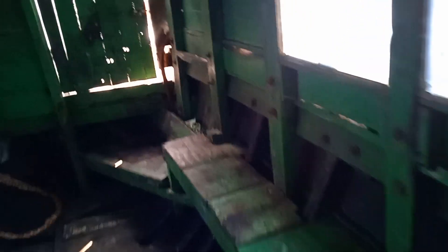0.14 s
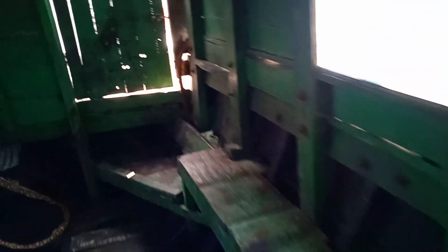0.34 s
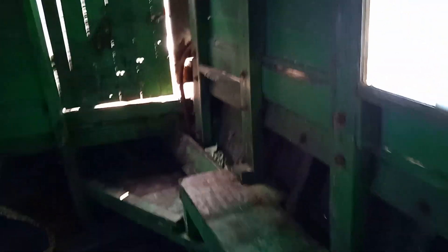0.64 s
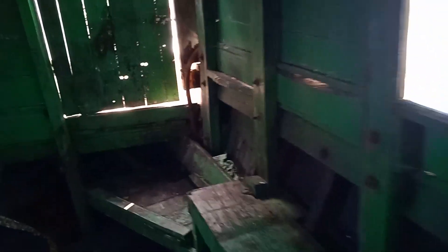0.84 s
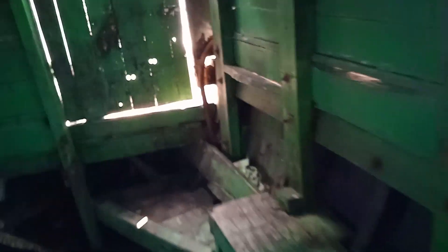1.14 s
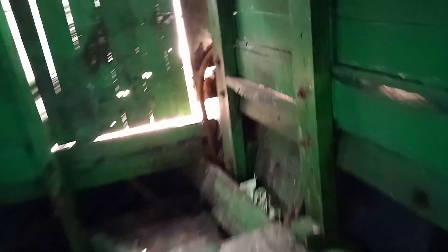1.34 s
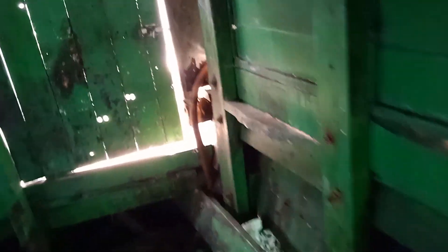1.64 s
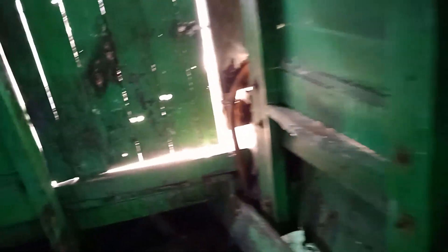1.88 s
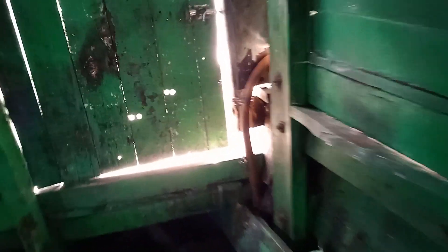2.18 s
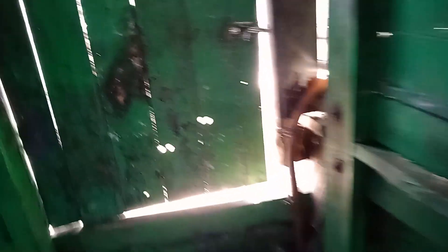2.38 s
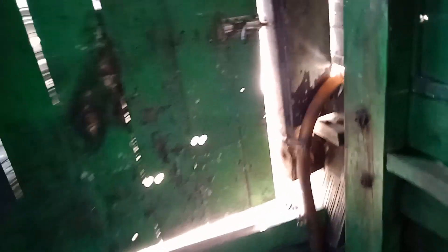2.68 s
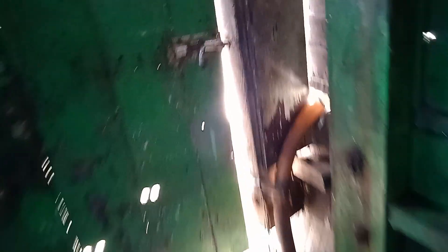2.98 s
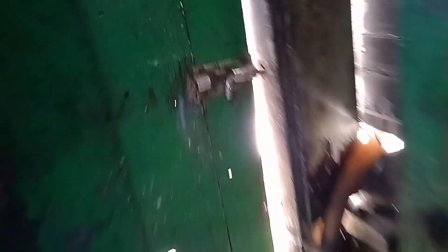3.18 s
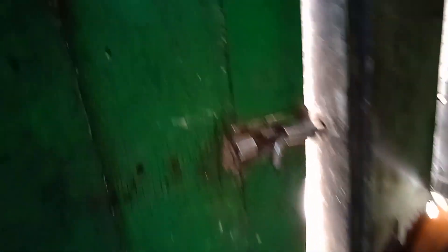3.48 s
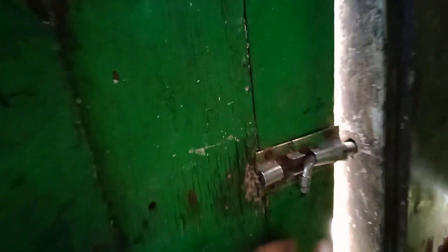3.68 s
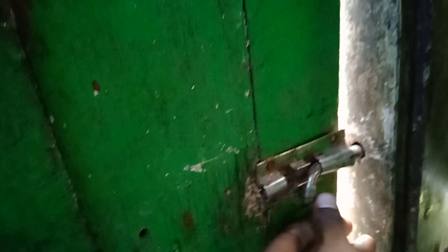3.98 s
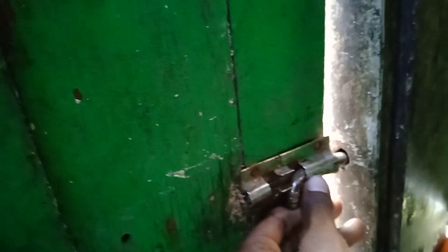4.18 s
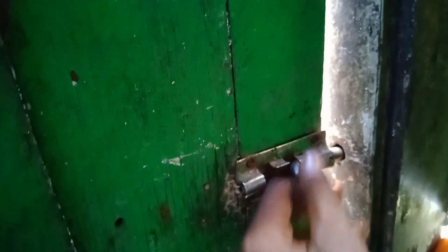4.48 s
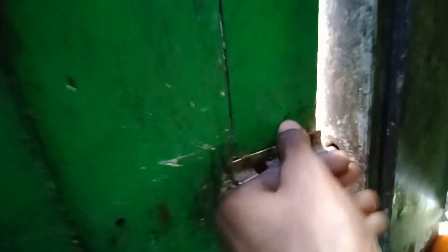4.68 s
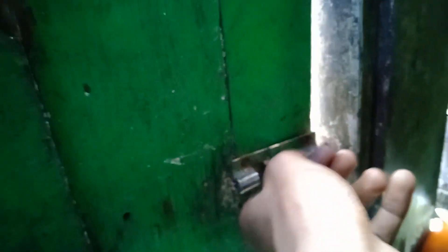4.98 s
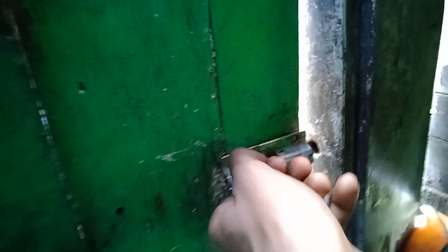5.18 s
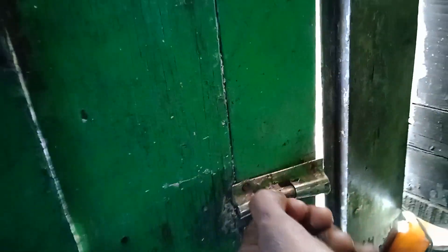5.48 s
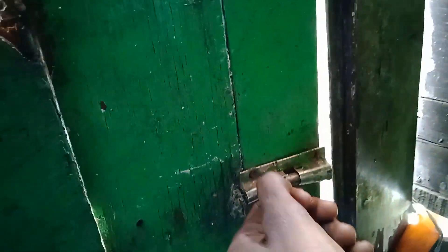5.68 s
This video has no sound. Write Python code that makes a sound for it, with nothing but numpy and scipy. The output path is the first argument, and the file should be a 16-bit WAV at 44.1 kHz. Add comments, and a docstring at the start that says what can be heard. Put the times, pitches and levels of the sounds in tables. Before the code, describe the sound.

Irregular footsteps knock and thud on loose planks over a hollow floor, joined by light scuffing. The steps fade and a nearby metal sliding bolt starts to click, scrape and jingle, with one tiny squeak. It snaps back sharply, and the wooden door gives several light knocks and rattles. The small wooden room adds a short tail to the metal, while a soft low rumble swells under faint steady hiss.

```python
"""From the start, someone walks over loose floor boards in a small wooden cabin: each footfall rattles
the boards and booms in the hollow floor. From 2 s the soles also scuff. From 4.1 s a steel door bolt is
worked by hand: it clicks and scrapes, and its loose handle chirps and rings. From 4.55 s the plank door
knocks as it is pulled; near 5.2 s the bolt shoots back. The plank walls give the steel a short tail.
Throughout, a low rumble swells after the footfalls and door knocks, under faint steady hiss."""
import sys
import numpy as np
from scipy import signal
from scipy.fft import rfft, irfft, next_fast_len
from scipy.io import wavfile
from scipy.ndimage import uniform_filter1d, map_coordinates

SR = 44100
rng = np.random.default_rng(int(sys.argv[2]) if len(sys.argv) > 2 else 0)


def transcribe(signal):
    """Save signal, clipped to [-1, 1], as a 16-bit WAV file at the path in sys.argv[1]."""
    frames = np.atleast_2d(signal).T
    limited = np.clip(frames, -1, 1)
    pcm = np.round(limited * 32767).astype(np.int16)
    wavfile.write(sys.argv[1], SR, pcm)


N = 257544

# Footfalls: (time [s], rattle [dB], boom [dB], boom pitch [Hz], boom t60 [s], ring [dB],
# ring pitch [Hz], bass [dB], treble [dB], wood t60 before cap [s])
FOOTFALLS = [(0.0169, -40, -40, 179, .3, -41, 522, -5.5, -8.5, .18),
             (0.3252, -33.5, -36.5, 169.4, .36, -37, 689, -4.5, -10.5, .19),
             (0.5404, -64, -54.5, 166, .12, -64, 286, 5.5, -5, .25),
             (0.8173, -35, -35.5, 183, .16, -31, 729, 3.5, -26, .26),
             (0.8336, -32, -34.5, 174, .13, -23, 542, -.5, -30, .21),
             (0.9806, -40.5, -18, 140.2, .36, -35.5, 692, -1.5, -14, .23),
             (1.3558, -26, -27, 196.5, .3, -46, 318, -6, -9, .195),
             (2.1218, -45.5, -42.5, 203, .43, -46.5, 649, 8, 7, .2),
             (2.1977, -48.5, -41.5, 162, .34, -57, 690, 5.5, -4, .21),
             (2.3409, -54, -43, 130.5, .33, -47, 632, 6, -6, .22),
             (2.3557, -45.5, -42, 191, .22, -47.5, 608, 4.5, -12, .19),
             (2.5335, -52, -48, 149, .45, -50, 285.5, 8, -21, .28),
             (2.612, -47, -39, 157, .37, -47.5, 296, 1.5, -2.5, .28),
             (2.6679, -35.5, -33, 154.5, .38, -37, 363, -2.5, -18, .22),
             (2.7, -32, -31.5, 148, .48, -26.5, 300.4, 4.5, -21.5, .25),
             (3.0978, -34.5, -31, 196, .31, -38, 312.8, 5.5, -19, .2),
             (3.3078, -44, -45, 143, .22, -66, 654, -10, 8, .18),
             (3.4104, -50, -29, 167.6, .13, -40, 382.5, 10.5, -15, .25),
             (3.4272, -44, -29, 160.7, .29, -51, 389, 0, -14, .22),
             (3.8824, -62, -53.5, 149, .24, -57.5, 364, -4, -8, .18)]


def footsteps():
    """Feet strike loose boards over a hollow floor."""
    return knocks(FOOTFALLS, modes_gain=1.31, rise_s=.003)


# Plank rattle spectrum: (frequency [Hz], density [dB])
PLANK_SPECTRUM = [(120, -4.5), (200, -7), (774, -11.5), (903, -15), (1000, -13), (1790, -12), (2480, -16),
                  (3740, -22), (5840, -25), (8000, -35), (10000, -56), (13000, -85), (22000, -120)]
# Plank decay: (frequency [Hz], multiple of wood t60 [1])
PLANK_DECAY = [(200, 1.27), (1000, 1.27), (3000, 1.15), (8000, .8)]


def knocks(blows, modes_gain, rise_s, mode_count=26, t60_cap_s=.29):
    """Each blow meets other planks: a crack, random modes in dying noise, one plank's ring, a boom."""
    out, t = np.zeros(N), np.arange(SR // 3) / SR
    for at_s, db, boom_db, boom_hz, boom_t60_s, ring_db, ring_hz, bass_db, treble_db, t60_s in blows:
        t60_s = min(t60_s, t60_cap_s)
        tilt = [(450, bass_db), (900, 0), (2500, 0), (5000, treble_db)]
        colour_db = lambda hz: along(PLANK_SPECTRUM, hz) + along(tilt, hz)
        decay_s = lambda hz: t60_s * along(PLANK_DECAY, hz)
        mode_hz = 250 * 10.5 ** rng.random((mode_count, 1)) ** .7
        phase = rng.uniform(0, 2 * np.pi, (mode_count, 1))
        gains = amp(colour_db(mode_hz) + rng.normal(0, 1.86, (mode_count, 1)))
        modes = (gains * mode(t, mode_hz, decay_s(mode_hz), phase)).sum(axis=0) / np.linalg.norm(gains)
        crack = burst(lambda hz: colour_db(hz) + 3 * np.log2(hz / 1000 + 1), lambda hz: .04, len(t))
        rattle = amp(db) * (burst(colour_db, decay_s, len(t)) + modes_gain * modes + 1.7 * crack)
        # A loose plank does not hold its phase.
        drift_rad = uniform_filter1d(np.cumsum(rng.normal(0, .079, len(t))), size=90)
        ring = amp(ring_db) * mode(t, ring_hz, t60_s, drift_rad)
        attack = (1 - np.exp(-t / rise_s)) ** 2
        hollow = boom(boom_db, boom_hz, boom_t60_s, rise_s + .0015)  # builds more slowly
        add(out, at_s - rise_s, (rattle + ring) * attack + hollow)
    return out


def boom(db, hz, t60_s, rise_s):
    """The hollow behind the boards: a short upper mode beats against a longer lower one."""
    t = np.arange(SR // 3) / SR
    upper = mode(t, hz, .6 * t60_s)
    lower = .54 * mode(t, .86 * hz, t60_s, phase=1.98)
    return amp(db) * (upper + lower) * (1 - np.exp(-t / rise_s))


# Bolt and other hard contacts: (time [s], level [dB], emphasis [Hz], low [dB], top [dB])
CONTACTS = [(3.3076, -35.5, 2290, -14, -20), (4.1219, -44.5, 5600, -21, -20), (4.397, -63, 2400, -6.5, -28),
            (4.434, -56.5, 5630, -9.5, -20), (4.5487, -48, 6670, -19, -18),
            (4.5588, -33.5, 6730, -20.5, -27.5), (4.5752, -54, 7100, -9, -24),
            (4.6117, -33.5, 4500, -17, -18), (4.735, -56, 5760, -10, -20), (4.91, -68, 2420, -16, -24),
            (5.229, -23.5, 5370, -16, -7.5), (5.2582, -22.5, 5500, -17.5, -16),
            (5.3098, -39.5, 5530, -5, -14), (5.367, -51.5, 6640, -11, -28), (5.3968, -62, 2390, -8, -22),
            (5.4064, -66, 2380, 1, -14), (5.423, -63.5, 6080, -6, -27.5), (5.5398, -64, 6310, -20, -21),
            (5.5545, -52, 2260, -21, -23), (5.5767, -48, 5240, -20, -26), (5.596, -57.5, 2100, -22, -2),
            (5.7377, -65, 2050, -18, -23), (5.797, -68, 5300, -5, -9), (5.808, -60, 2270, -12, -13)]
# Bolt modes: (frequency [Hz], level [dB], base t60 [s])
BOLT_MODES = [(1680, -8.5, 0.12), (2300, -4, 0.09), (2640, -7, .12), (3255, -17.5, 0.19),
              (3725, -12.5, 0.081), (4380, -26, 0.12), (4870, -4.5, 0.12), (5204, -5.5, 0.097),
              (5510, 1.5, 0.047), (6110, 0, 0.065), (6820, -6.5, 0.089), (7130, -4.5, 0.078),
              (8120, -13.5, .05), (9800, -14, 0.078), (10370, -2.5, .05), (11200, 2, 0.029),
              (12000, -30.5, .07), (13230, -10, .06)]


def bolt_clicks(rise_s=.00044, t60_scale=.5):
    """Each contact rings the steel modes at new strengths, over a short crack."""
    out, t = np.zeros(N), np.arange(SR // 5) / SR
    for at_s, db, emphasis_hz, low_db, top_db in CONTACTS + finger_contacts():
        tilt = [(400, low_db - 13.5), (1600, low_db + 3), (3900, low_db), (4600, -10.5), (8000, -9),
                (10000, top_db + 1), (13300, top_db - .5), (15000, top_db - 3)]
        colour_db = lambda hz: along(tilt, hz) + 6 / (1 + ((hz - emphasis_hz) / 700) ** 2)
        ring = np.zeros(len(t))
        for hz, mode_db, t60_s in BOLT_MODES:
            gain = amp(mode_db + colour_db(hz) + rng.normal(0, 3))
            ring += gain * mode(t, hz, t60_s * t60_scale, rng.uniform(0, 2 * np.pi))
        crack = burst(colour_db, lambda hz: .043, len(t))
        attack = 1 - np.exp(-t / rise_s)
        add(out, at_s - rise_s, amp(db) * (1.38 * ring + crack) * attack)
    return out


def finger_contacts(count=8, from_s=4.25):
    """Faint random ticks of the hand on the bolt, as CONTACTS rows."""
    return [(from_s + when * (N / SR - from_s), -83 + 8 * force, 2300, -6, -11)
            for when, force in rng.random((count, 2))]


# Bolt strokes: (time [s], mid level [dB], low re mid [dB], top re mid [dB],
# swell t60 [s], hold [s], fade t60 [s])
BOLT_STROKES = [(4.125, -58, 2, -16, .01, 0.0016, 0.022), (4.215, -80, -8, -2, 0.45, .002, 0.075),
                (4.578, -44.5, -3, -13, 0.057, .002, 0.083), (4.612, -48, 1.5, -17, 0.013, .008, .03),
                (4.63, -60.5, -1.5, -5, .01, 0.051, .05), (4.746, -61.5, -5.5, -12, 0.3, 0.0028, 0.11),
                (4.77, -82, -7, -10, .01, .03, 0.3), (4.91, -62.5, 9, -8, 0.028, 0.0029, 0.043),
                (4.94, -79, -1, -8, .01, 0.029, 0.075), (5.05, -64, -8, -9, 0.059, 0.044, 0.12),
                (5.18, -69.5, -2, -2.5, .02, .035, 0.024), (5.219, -47.5, -0.5, -2, .01, .009, .01),
                (5.232, -42.5, -3.5, -7, .006, .022, .02), (5.26, -50, -1, -5, .005, .008, 0.03),
                (5.297, -44.5, -7, -3, 0.15, .005, 0.084), (5.329, -61, -4.5, -11, 0.011, .002, 0.38),
                (5.572, -51.5, -4, -12, 0.04, .002, 0.059), (5.604, -66.5, -8, -8, .01, .002, 0.21),
                (5.74, -70, -2, -2, .03, 0.0018, 0.1), (5.83, -67, -3.5, -11, 0.3, .01, .1)]
# Bolt scrape spectrum, with a bright microphone resonance near 15 kHz: (frequency [Hz], density [dB])
SCRAPE_SPECTRUM = [(900, -21), (1800, -18), (2300, -12), (4000, -6.5), (7400, -2.5), (8400, -11.5),
                   (13500, -21.5), (14600, 0), (15700, -23)]


def bolt_scrapes(resonance_db=11):
    """The bolt slides in its guides; grainy friction excites its modes."""
    def resonances(hz):
        return 1 + sum(amp(db + resonance_db - 4.4 * np.log2(mode_hz / 3000))
                       / (1 + ((hz - mode_hz) * t60_s / 5) ** 2) for mode_hz, db, t60_s in BOLT_MODES)

    grit = friction(SCRAPE_SPECTRUM, grain_db=5, grain_hz=640)
    return rubbing(BOLT_STROKES, filtered(grit, resonances))


# Door knocks: (time [s], rattle [dB], boom [dB], ring [dB], ring pitch [Hz],
# bass [dB], treble [dB], wood t60 before cap [s])
DOOR_BLOWS = [(4.5575, -50.5, -56, -52.5, 490, -4.5, 7, 0.26),
              (4.6153, -55.5, -46.5, -53.5, 357, -1, 11, 0.25),
              (4.7501, -59.5, -52, -57, 373, -11, -22, .23), (5.0479, -66, -53, -50.5, 351, -4, -3, 0.38),
              (5.2286, -40.5, -50.5, -49, 287, -12.5, 4, 0.18),
              (5.2577, -32.5, -51, -39, 561, -3, -16, 0.062), (5.308, -52.5, -47.5, -54.5, 442, -3, -3, .2),
              (5.53, -64.5, -56, -68, 310, -8, -2, 0.18), (5.5542, -47, -49.5, -45, 275, 4.5, -16, 0.07),
              (5.5703, -40.5, -43, -43, 294, 5, -14, .11), (5.6238, -47, -51, -47, 625, 7, -30, .11),
              (5.678, -56, -50.5, -62, 407, 0.5, -35, 0.21), (5.7378, -58, -58, -64, 336, -0.5, -9, .11),
              (5.768, -60.5, -53, -57.5, 726, -5, -12, 0.32)]


def door_knocks(boom_hz=170, boom_t60_s=.22):
    """The pulled door's planks knock like the boards, with one boom pitch of their own."""
    blows = [(at_s, db, boom_db, boom_hz, boom_t60_s, *rest) for at_s, db, boom_db, *rest in DOOR_BLOWS]
    return knocks(blows, modes_gain=1.44, rise_s=.0028)


# Handle taps: (time [s], level [dB], rise [s])
HANDLE_TAPS = [(4.578, -59, .003), (4.616, -39.5, 0.0018), (4.9, -52.5, 0.0046)]
# Handle modes: (frequency [Hz], level [dB], t60 [s])
HANDLE_MODES = [(2300, -10, 0.064), (2616, -11, 0.096), (3280, -3.5, 0.1), (3810, 5.5, 0.065)]


def handle_taps():
    """The dangling handle taps and rings briefly on four modes."""
    out, t = np.zeros(N), np.arange(SR // 5) / SR
    for at_s, db, rise_s in HANDLE_TAPS:
        ring = sum(amp(mode_db + rng.normal(0, 1.8)) * mode(t, hz * rng.normal(1, .012), t60_s)
                   for hz, mode_db, t60_s in HANDLE_MODES)
        add(out, at_s, amp(db) * ring * (1 - np.exp(-t / rise_s)) ** 2)
    return out


# Handle chirp: (time [s], pitch [Hz], level [dB])
CHIRP = [(4.575, 6700, -47), (4.585, 7089, -54), (4.591, 7200, -37), (4.605, 7320, -59)]


def handle_squeak(fade_s=.0039):
    """The turning handle gives a short rough whistle of steel on steel."""
    t = np.arange(N) / SR
    at_s, hz, db = np.transpose(CHIRP)
    gate = np.clip(np.minimum(t - at_s[0], at_s[-1] - t) / fade_s, 0, 1)
    level_db = np.interp(t, at_s, db) + 3 * wobble(270)
    pitch_hz = np.interp(t, at_s, hz) + 90 * wobble(820)
    return gate * amp(level_db) * np.sin(2 * np.pi * np.cumsum(pitch_hz) / SR)


# Sole strokes: (time [s], mid level [dB], low re mid [dB], top re mid [dB],
# swell t60 [s], hold [s], fade t60 [s])
SOLE_STROKES = [(2.126, -67, -15, 0, .03, .002, .12), (2.195, -68, 3, 3, .04, .03, .5),
                (2.4, -77, 8, -3, .55, .002, .3), (2.618, -54, -19, 0, .02, .002, .14),
                (2.706, -72, 4, -25, .08, .002, .13), (3.066, -63, 2, 1, .06, .04, .18),
                (3.31, -49, -10, 3, .01, .02, .2), (3.7, -64, 0, -5, .15, .025, .09)]
# Sole friction spectrum: (frequency [Hz], density [dB])
SOLE_SPECTRUM = [(350, -6.5), (600, -6), (1160, -13), (1890, -1.5), (3400, -11.5), (7310, -6), (10000, -26),
                 (15700, -16)]


def sole_scuffs():
    """Soles drag over the boards with nearly smooth friction."""
    return rubbing(SOLE_STROKES, friction(SOLE_SPECTRUM, grain_db=.5, grain_hz=1400))


# Soft floor loads: (time [s], level [dB], boom pitch [Hz], boom t60 [s])
SOFT_LOADS = [(0.7, -55, 135, 0.22), (1.701, -50.5, 173, 0.076), (3.608, -50.5, 156, 0.48),
              (3.807, -57, 148, 0.23)]


def weight_shifts():
    """Shifting weight stirs only the hollow under the floor."""
    out = np.zeros(N)
    for at_s, db, hz, t60_s in SOFT_LOADS:
        add(out, at_s, boom(db, hz, t60_s, rise_s=.0041))
    return out


# Cabin reverberation: (frequency [Hz], t60 [s])
CABIN_DECAY = [(500, .4), (3000, 0.14), (12000, 0.11)]


def cabin(x, wet_db):
    """The plank walls answer with a short tail."""
    tail = burst(lambda hz: 0, lambda hz: along(CABIN_DECAY, hz), SR // 2)
    delayed = np.pad(x, (150, 0))  # 3.4 ms
    return x + amp(wet_db) * signal.fftconvolve(delayed, tail / np.linalg.norm(tail))[:N]


# Hiss spectrum: (frequency [Hz], density [dB])
HISS_SPECTRUM = [(200, -20), (300, 0), (500, -4), (1400, -6), (2100, -3), (2700, -8), (4000, -15),
                 (6300, -9), (8300, -14), (9500, -22), (13000, -24), (15200, -16)]
# Rumble spectrum: (frequency [Hz], density [dB])
RUMBLE_SPECTRUM = [(20, -23.5), (60, -7), (100, -1.5), (160, -3), (230, -4.5), (300, -18), (450, -50)]
# Rumble envelope: (time [s], level [dB])
RUMBLE_LEVELS = [(0.0, -73), (0.68, -70), (0.9, -64.5), (1.01, -50.5), (1.15, -70), (1.74, -69.5),
                 (2.0, -77.5), (2.18, -60.5), (2.47, -65.5), (2.8, -51.5), (2.98, -71.5), (3.15, -78),
                 (3.35, -59.5), (3.58, -62), (3.95, -74.5), (4.5, -70), (4.65, -64), (4.95, -71),
                 (5.22, -64), (5.5, -73.5), (5.73, -62.5), (5.84, -68)]


def hiss_and_rumble(hiss_db=-76):
    """Low rumble, timed to swell after the footfalls and door knocks, under steady hiss."""
    hiss = amp(hiss_db + 1.5 * wobble(3)) * noise(HISS_SPECTRUM)
    rumble_db = np.interp(np.arange(N) / SR, *np.transpose(RUMBLE_LEVELS))
    return hiss + amp(rumble_db + 2.2 * wobble(7.3)) * noise(RUMBLE_SPECTRUM)


def friction(spectrum, grain_db, grain_hz):
    """Coloured noise broken into uneven grains, rms 1."""
    return unit(noise(spectrum) * amp(grain_db * wobble(grain_hz)))


def rubbing(strokes, grit):
    """Each stroke swells, holds and fades its own three-band mix of friction noise."""
    low = filtered(grit, lambda hz: hz < 4200)
    top = filtered(grit, lambda hz: hz > 9000)
    bands = np.array([unit(low), unit(grit - low - top), unit(top)])
    out, t = np.zeros(N), np.arange(N) / SR
    for at_s, db, low_db, top_db, swell_s, hold_s, fade_s in strokes:
        drop_db = 60 * np.maximum((at_s - t) / swell_s, (t - at_s - hold_s) / fade_s).clip(0)
        out += amp(db - drop_db) * (amp([low_db, 0, top_db]) @ bands)
    return out


def mode(t, hz, t60_s, phase=0):
    """Damped sine."""
    return amp(-60 * t / t60_s) * np.sin(2 * np.pi * hz * t + phase)


def burst(colour_db, t60_s, samples):
    """Dying noise from rms 1; colour and t60 are functions of frequency."""
    hz, t, bins = signal.stft(rng.standard_normal(samples), SR, nperseg=256)
    gain = unit(amp(colour_db(hz[:, None])))
    decay = amp(-60 * t / t60_s(hz[:, None]))
    return signal.istft(bins * gain * decay, SR, nperseg=256)[1][:samples]


def noise(spectrum):
    """Coloured noise, rms 1."""
    return unit(filtered(rng.standard_normal(N), lambda hz: amp(along(spectrum, hz))))


def wobble(rate_hz):
    """Smooth random curve, rate_hz knots a second."""
    knots = rng.standard_normal(int(N * rate_hz / SR) + 4)
    return map_coordinates(knots, [np.arange(N) * rate_hz / SR])


def filtered(x, response):
    """Zero-phase filter with gain response(hz)."""
    size = next_fast_len(len(x) + 4096)
    return irfft(rfft(x, size) * response(np.fft.rfftfreq(size, 1 / SR)), size)[:len(x)]


def along(points, hz):
    """Interpolates (frequency [Hz], value) points on a log axis."""
    knot_hz, values = np.transpose(points)
    return np.interp(np.log(hz + 1), np.log(knot_hz + 1), values)


def add(track, at_s, sound):
    part = track[round(at_s * SR):][:len(sound)]
    part += sound[:len(part)]


def amp(db):
    return 10 ** (np.asarray(db) / 20)


def unit(x):
    return x / np.sqrt(np.mean(x ** 2) + 1e-20)


def scene():
    """Feet, door and bolt in mono; only the bolt layer reverberates."""
    feet = footsteps() + weight_shifts() + sole_scuffs()
    bolt = bolt_clicks() + handle_taps() + handle_squeak() + bolt_scrapes()
    return (feet + door_knocks() + cabin(bolt, wet_db=-14))[None]


def record(dry):
    """The microphone sheds deep bass; hiss and rumble join; nothing passes above the band limit."""
    low_cut_hz, limit_hz, taper_hz = 85, 15880, 200
    high_pass = signal.butter(4, low_cut_hz, "high", fs=SR, output="sos")
    heard = signal.sosfilt(high_pass, dry[0]) + hiss_and_rumble()
    band_limit = lambda hz: np.sin(np.pi / 2 * np.clip((limit_hz - hz) / taper_hz, 0, 1)) ** 2
    return filtered(heard, band_limit)[None]


dry = scene()
out = record(dry)
transcribe(out)
```